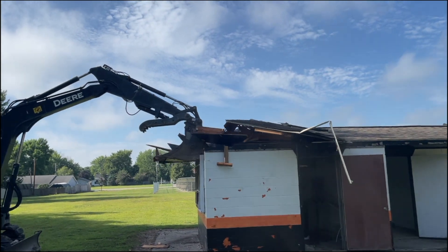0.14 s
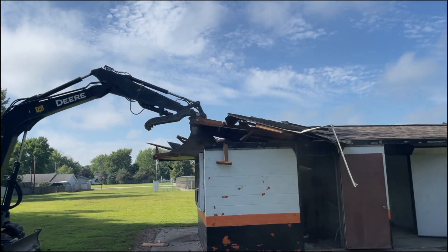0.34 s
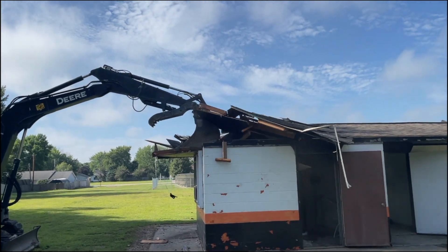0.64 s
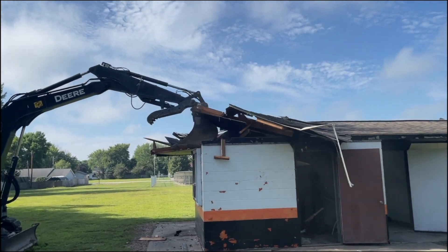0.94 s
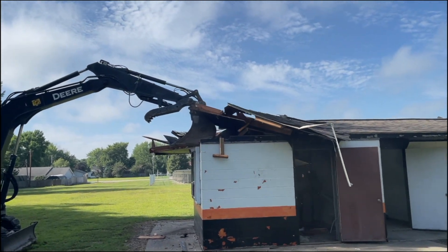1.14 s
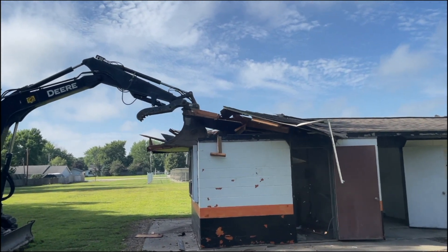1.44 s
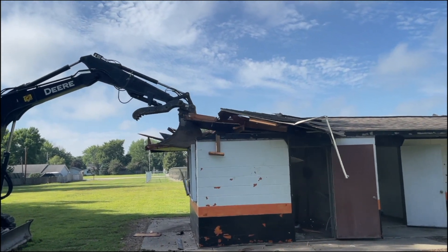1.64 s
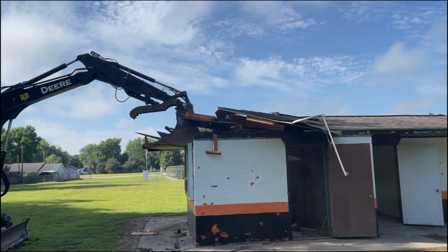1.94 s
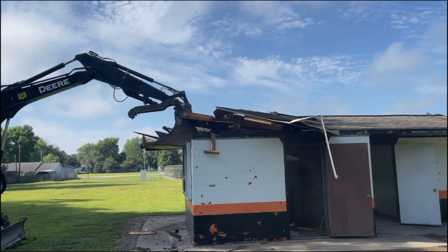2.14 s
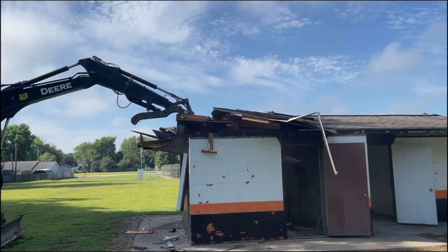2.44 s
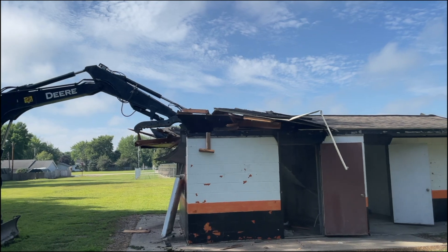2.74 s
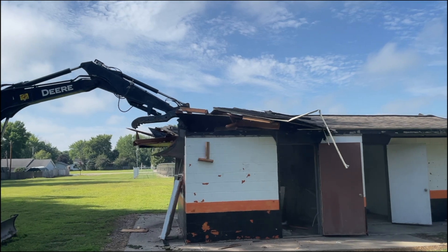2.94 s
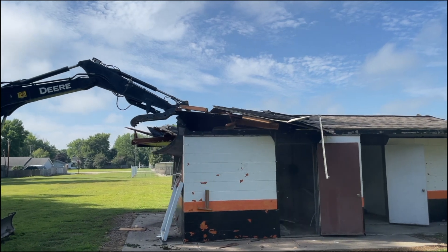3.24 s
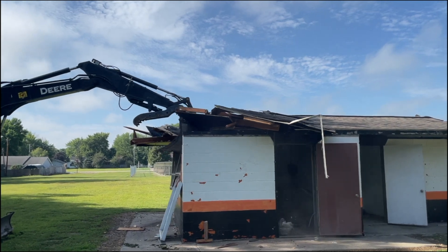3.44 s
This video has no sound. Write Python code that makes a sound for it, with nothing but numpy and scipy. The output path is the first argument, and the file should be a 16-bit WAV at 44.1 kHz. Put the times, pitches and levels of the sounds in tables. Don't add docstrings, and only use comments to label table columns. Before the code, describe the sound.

A timber roof crunches and splinters under an excavator bucket while its diesel throbs. Scattered knocks and snaps build to heavy breaks and thuds near the end, outdoors, close stereo microphone.

```python
import sys
import numpy as np
from scipy import signal
from scipy.fft import rfft, irfft, next_fast_len
from scipy.io import wavfile
from scipy.ndimage import uniform_filter1d, map_coordinates

SR = 44100
rng = np.random.default_rng(int(sys.argv[2]) if len(sys.argv) > 2 else 0)


def master_out(mix):
    frames = np.transpose(np.atleast_2d(mix))
    ceiling = np.clip(frames, -1, 1)
    pcm = np.round(ceiling * 32767).astype(np.int16)
    wavfile.write(sys.argv[1], SR, pcm)


def decibels_to_gain(level_db):
    exponent = np.asarray(level_db, float) / 20
    return 10 ** exponent


N = 158760
TIME = np.arange(N) / SR


def unit(x):
    return x / np.sqrt(np.mean(x ** 2) + 1e-20)


def curve(points, x):
    return np.interp(x, *np.transpose(points))


def along(points, hz):
    f, v = np.transpose(points)
    return np.interp(np.log(hz + 1), np.log(f + 1), v, left=-90, right=-90)


def wobble(rate):
    knots = rng.standard_normal(int(N * rate / SR) + 4)
    return map_coordinates(knots, [np.arange(N) * rate / SR])


def filtered(x, response):
    m = next_fast_len(N + 8192)
    return irfft(rfft(x, m) * response(np.fft.rfftfreq(m, 1 / SR)), m)[..., :N]


def coloured(x, spectrum):
    def causal(hz):
        cepstrum = irfft(np.log(decibels_to_gain(along(spectrum, hz))))
        half = len(cepstrum) // 2
        cepstrum[1:half] *= 2
        cepstrum[half + 1:] = 0
        return np.exp(rfft(cepstrum))
    return filtered(x, lambda hz: np.resize(causal(hz), len(hz)))


def bucket_pull():
    # time in seconds, force in dB, sharpness in dB, weight in dB.
    pull = [(0, -35.5, 12.5, 6.5), (.12, -29, -3, -4.5), (.3, -25.5, 2, -7), (.48, -29.5, 5.5, -1),
            (.65, -29.5, -0.5, -1), (.82, -25, -8, -0.5), (1.04, -30.5, -8, -17), (1.14, -44.5, 13.5, 3.5),
            (1.35, -29.5, -2, -3), (1.82, -38, -4, -4.5), (2.27, -39.5, 8, 12.5), (2.45, -25.5, 4, -3.5),
            (2.76, -25.5, 2, -3.5), (2.97, -30.5, 2.5, 2.5), (3.24, -19.5, 1, 3.5),
            (3.41, -18.5, -5.5, -3.5), (3.44, -26.5, -10, -5), (3.6, -22.5, -2.5, -8)]
    # start in seconds, length in seconds, force over the pull in dB.
    crushes = [
        (0.312, 0.067, 3.5),
        (0.869, 0.095, 4.5),
        (1.097, 0.077, 7.5),
        (1.546, 0.1, 2.5),
        (2.5, 0.027, 3.5),
        (2.598, 0.123, 7.5),
        (3.089, 0.11, 4.5),
        (3.2, 0.073, 2),
    ]
    s, *columns = np.transpose(pull)
    force, sharp, weight = [np.interp(TIME, s, column) for column in columns]
    edge_s = 0.007
    for start, length, db in crushes:
        ramp = np.minimum(TIME - start, start + length + edge_s - TIME) / edge_s
        force = force + db * np.clip(ramp, 0, 1)
    return force, sharp, weight


def engine():
    # time in seconds, firing in Hz.
    speed = [(0, 57.22), (.25, 57.97), (.78, 58.33), (.95, 56.45), (1.25, 57.45), (1.8, 57.82),
             (2.3, 57.06), (2.65, 57.9), (2.95, 54.08), (3.6, 53.35)]
    # time in seconds, level in dB.
    load = [(0, -7), (.25, 2), (1.15, .5), (1.9, -1), (2.4, 3.5), (2.7, 4.5), (2.85, 0.5), (3.6, -4.5)]
    # multiple of the firing rate, level in dB.
    exhaust = [(1, -29.5), (2, -25.5), (3, -45), (4, -49.5), (5, -36.5), (10, -42)]
    # frequency in Hz, density in dB per Hz.
    casing = [(20, -44), (55, -21.5), (150, -5), (300, -36), (390, -41), (600, -14.5), (1600, -73.5),
              (2400, -32.5), (3300, -53.5), (15900, -54)]
    firing_hz = curve(speed, TIME) * (1 + 0.003 * wobble(3.06))
    turn = 2 * np.pi * np.cumsum(firing_hz) / SR
    pipe = np.zeros(N)
    for k, db in exhaust:
        sway = decibels_to_gain(db + 1.3 * wobble(9.8))
        pipe += sway * np.sqrt(2) * np.sin(k * turn + 6 * rng.random())
    fan = decibels_to_gain(-38.5 + 2.5 * wobble(5.6)) * np.sqrt(2) * np.sin(turn * 252 / 56.75)
    throb = rng.standard_normal(N) * (1 + 0.51 * np.cos(turn)) * decibels_to_gain(0.4 * wobble(6))
    motor = decibels_to_gain(curve(load, TIME)) * pipe + fan + decibels_to_gain(-30) * unit(coloured(throb, casing))

    recovery = 13 * TIME
    over = 1.33 * np.maximum(bucket_pull()[0] + 24, 0)
    duck_db = np.maximum.accumulate(over + recovery) - recovery
    return decibels_to_gain(-uniform_filter1d(duck_db, size=2000)) * motor


def crunch():
    # frequency in Hz, density in dB per Hz.
    timber = [(120, -53), (200, -2.5), (720, -4.5), (2300, -13), (5000, -21.5), (8000, -22), (13500, -37),
              (15900, -60)]
    # frequency in Hz, density in dB per Hz.
    slump = [(18, -37), (30, -6), (64, 2), (167, 2), (212, 3.5), (312, 0), (500, -9), (650, -23),
             (1100, -120)]
    force, sharp, weight = bucket_pull()
    grains_per_s, grain_samples = 2300, 280
    rows = rng.random((int(grains_per_s * 3.6), 4))
    start = (rows[:, 0] * N).astype(int)
    hz = 300 * 30 ** rows[:, 1:2]
    t = np.arange(grain_samples) / SR
    size = decibels_to_gain(-2.5 * np.log(rows[:, 2:3] + 0.011)) * np.sqrt(hz)
    decay = np.exp(-t * hz / (1 + 6 * rows[:, 3:] ** 2))
    wave = size * np.sin(2 * np.pi * hz * t) * decay
    place = start[:, None] + np.arange(grain_samples)
    grains = np.bincount(place.ravel(), wave.ravel(), N + grain_samples)[:N]

    ticks = (rng.random(N) < 45 / SR) * rng.standard_normal(N) * decibels_to_gain(20)
    rubbing = 2.69 * rng.standard_normal(N)
    clump = decibels_to_gain(1.09 * wobble(34.93) + 0.83 * wobble(90))
    wood = unit(coloured(clump * (unit(grains) + ticks + rubbing), timber))
    high = filtered(wood, lambda f: 1j * f / (1200 + 1j * f))
    body = unit(coloured(rng.standard_normal(N) * decibels_to_gain(1.43 * wobble(22.005)), slump))
    return decibels_to_gain(force) * (wood - high + decibels_to_gain(sharp) * high + decibels_to_gain(1.5 + weight) * body)


def blows(table, colour, ring_db, crack_db):
    burst, ring = np.zeros((2, N + SR))
    t = np.arange(SR // 3) / SR
    for s, db, hz, t60 in table:
        i, t60 = round(s * SR), max(t60, .01)
        span = slice(i, i + len(t))
        noise, beat = rng.standard_normal((2, len(t)))
        rise = decibels_to_gain(db) * (1 - np.exp(-t / .0002))
        ragged = decibels_to_gain(2.5 * np.repeat(noise[:len(t) // 60 + 1], 60)[:len(t)])
        splinter = ragged * decibels_to_gain(-60 * t / t60) * (1 - np.exp(-t / .001))
        click = decibels_to_gain(crack_db - 60 * t / .007)
        burst[span] += rise * noise * (splinter + click)
        rough = 1 + 1.2 * hz / (hz + 1500) * unit(uniform_filter1d(beat, size=int(3 * SR / hz)))
        ring[span] += rise * rough * decibels_to_gain(ring_db - 60 * t / t60) * np.sin(2 * np.pi * hz * t)
    return coloured(burst[:N], colour) + ring[:N]


def knocks():
    # start in seconds, peak in dB, pitch in Hz, t60 in seconds.
    boards = [(.002, -11.5, 806, 0.12), (.168, -10, 699, 0.085), (.31, -9, 1395, 0.076),
              (.72, -15.5, 605, 0.054), (.755, -12.5, 547, 0.16), (.874, -16, 488, 0.17),
              (.891, -14, 1310, 0.21), (1.104, -13, 1910, .08), (1.12, -15, 2620, 0.065),
              (1.412, -14, 395, 0.23), (1.525, -13, 782, 0.23), (1.913, -9, 735, 0.078),
              (1.914, -22, 1644, 0.015), (1.94, -10.5, 1385, 0.11), (1.958, -7, 735, 0.052),
              (2.246, -22, 610, 0.095), (2.295, -12, 1060, 0.072), (2.296, -9, 1496, 0.055),
              (2.305, -8, 596, .05), (2.32, 0.5, 662, 0.083), (2.435, -18, 1570, .04),
              (2.493, -9, 625.4, 0.081), (2.605, -7, 713, 0.097), (2.622, -11, 743, 0.19),
              (2.645, -3.5, 687, .1), (2.69, -7, 905, 0.13), (2.939, -12.5, 1200, 0.06),
              (3.003, -1, 566, 0.048), (3.009, -2, 473, 0.11), (3.228, -11, 1100, .1),
              (3.29, -21, 1113, 0.1), (3.244, -1, 428, 0.13)]
    # frequency in Hz, level in dB.
    colour = [(60, -20), (250, -3.5), (700, 2.5), (1500, -6), (3000, -18.5), (8000, -31)]
    return blows(boards, colour, ring_db=-10.5, crack_db=5.5)


def snaps():
    # start in seconds, peak in dB, pitch in Hz, t60 in seconds.
    breaks = [(.0752, -18, 1230, 0.021), (.1057, -24, 4980, 0.085), (.1421, -18.5, 4080, 0.033),
              (.148, -19.5, 765, 0.028), (.3854, -18, 4220, 0.044), (.45, -19, 4440, 0.07),
              (.5444, -22, 4020, .03), (.6933, -21, 2030, 0.039), (.759, -24, 3080, 0.038),
              (1.0765, -17, 2550, 0.0087), (1.0945, -6, 2389, 0.029), (1.0955, -8, 2720, 0.032),
              (1.097, -17.5, 4150, 0.048), (1.1114, -12.5, 6550, 0.01), (1.3927, -22.5, 3850, 0.037),
              (1.4994, -19.5, 6100, 0.0095), (1.736, -25.5, 4350, 0.029), (1.94, -22, 2850, 0.047),
              (2.1405, -25, 4300, 0.045), (2.3215, -15, 4640, 0.0097), (2.5087, -4.5, 1507, 0.053),
              (2.512, -7.5, 3245, 0.063), (2.517, -7, 4050, 0.054), (2.622, -7, 2610, .05),
              (2.7177, -6, 2180, 0.02), (2.719, -18, 2570, 0.04), (3.01, -13, 2104, 0.043),
              (3.101, -17, 2500, 0.062), (3.2266, -12, 2020, 0.066), (3.3634, -17, 5040, 0.035),
              (3.404, -16, 6000, 0.02), (3.4105, -4, 1647, 0.05), (3.415, -10, 2330, 0.029),
              (3.4135, -14, 4080, 0.022)]
    # frequency in Hz, level in dB.
    colour = [(300, -24), (1200, -8), (3000, -6), (6000, -10), (10000, -15), (14000, -18), (16600, -16)]
    return blows(breaks, colour, ring_db=-6, crack_db=6)


def thuds():
    # start in seconds, peak in dB, pitch in Hz, t60 in seconds.
    beams = [(.255, -15, 58, 0.2), (.34, -11, 59.4, 0.32), (.755, -15, 60, 0.36), (.76, -18, 261, .2),
             (1.09, -17.5, 57, 0.28), (2.325, -13, 111, 0.091), (2.34, -15.5, 63, 0.2),
             (2.61, -7.5, 140, 0.22), (2.655, -8.5, 65.7, 0.29), (2.899, -9.5, 329, 0.068),
             (2.943, -9, 150, .08), (3.045, -10, 103, 0.23), (3.13, -12, 105, .2), (3.21, -10, 55, 0.45),
             (3.245, -15.5, 110, 0.32), (3.27, -9, 165, 0.28), (3.3, -17.5, 262, .2),
             (3.47, -12, 100, 0.086)]
    # frequency in Hz, level in dB.
    colour = [(30, -32), (70, 23.5), (300, -10.5), (700, -27), (2000, -49)]
    return blows(beams, colour, ring_db=-1, crack_db=-30)


def squeaks():
    # start in seconds, length in seconds, pitch in Hz, level in dB.
    squeals = [(0.346, 0.041, 1055, -22.5), (1.992, .04, 1270, -28), (2.292, 0.018, 2330, -37),
               (2.345, 0.021, 1640, -35), (2.398, 0.048, 1990, -33), (2.411, 0.017, 1080, -27),
               (2.43, 0.055, 2250, -31), (2.475, 0.097, 2100, -33), (2.578, 0.022, 3010, -25),
               (2.758, 0.044, 2370, -34), (2.896, 0.036, 2150, -38)]
    out = np.zeros(N)
    chatter, drift = decibels_to_gain(1 * wobble(120)), wobble(60)
    for s, length, hz, db in squeals:
        i, u = round(s * SR), np.linspace(0, 1, round(length * SR))
        span = slice(i, i + len(u))
        pitch = hz * (1 + 0.027 * (u - .5) + 0.01 * drift[span])
        turn = 2 * np.pi * np.cumsum(pitch) / SR
        swell = np.sin(np.pi * u ** 0.53)
        out[span] += decibels_to_gain(db) * chatter[span] * swell * (np.sin(turn) + decibels_to_gain(-9) * np.sin(2 * turn))
    return out


def yard(x):
    # frequency in Hz, t60 in seconds.
    decay = [(200, 0.32), (2000, 0.15), (4500, 0.1), (10000, 0.055)]
    hz, t, z = signal.stft(rng.standard_normal(SR // 3), SR, nperseg=256)
    t60 = curve(decay, hz)[:, None]
    tail = signal.istft(z * decibels_to_gain(-60 * t / t60), SR, nperseg=256)[1]
    return signal.fftconvolve(np.pad(x, (500, 0)), tail / np.linalg.norm(tail))[:N]


def ports(x):
    # frequency in Hz, phase in radians by which the left leads.
    lead = [(0, 0), (1800, 0), (2800, .6), (4300, .1), (5200, .7), (6000, -.6), (7700, -2.9), (8800, -3.5),
            (10900, -5.9), (12200, -6.6), (13900, -9.2), (17000, -9.8)]
    # frequency in Hz, left over right in dB.
    sides = [(60, -1.6), (200, -2), (400, -1.2), (1300, -1.7), (4400, 1.6), (15000, -.2)]
    # frequency in Hz, level in dB.
    diffuse = [(30, -8), (300, -11.5), (1000, -4.5), (4000, 0.5), (7000, -7), (8200, -16), (9500, -4),
               (17500, -12)]

    def pair(hz):
        left = decibels_to_gain(curve(sides, hz) / 2) * np.exp(.5j * curve(lead, hz))
        return np.array([left, 1 / left])

    hz, _, z = signal.stft(x, SR, nperseg=256)
    chance = np.exp(2j * np.pi * rng.random((2,) + z.shape))
    scatter = signal.istft(z * chance * decibels_to_gain(along(diffuse, hz))[:, None], SR, nperseg=256)[1][:, :N]
    return filtered(x, pair) + scatter


def scene():
    hits = knocks() + snaps() + thuds() + squeaks()
    return ports(engine() + crunch() + hits + decibels_to_gain(-12) * yard(hits))


def low_pass(x):
    return signal.sosfilt(signal.butter(12, 16510, fs=SR, output="sos"), x)


def record(dry):
    def low_cut(f):
        return (1j * f / (33 + 1j * f)) ** 2 * (1 - 1 / (1 + (f / 30) ** 8))
    x = filtered(dry, low_cut)
    mix = x / (1 + np.abs(x) ** 6) ** (1 / 6)
    return low_pass(mix)


dry = scene()
out = record(dry)
master_out(out)
```